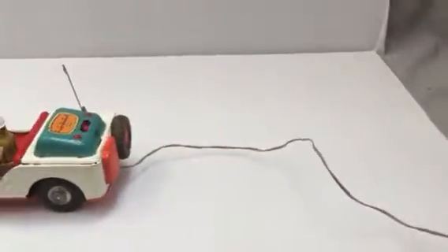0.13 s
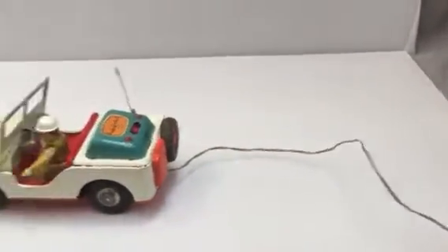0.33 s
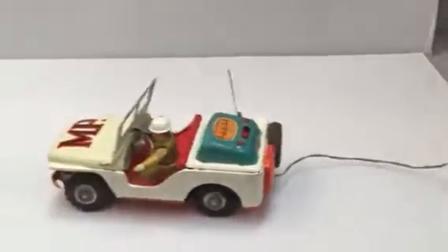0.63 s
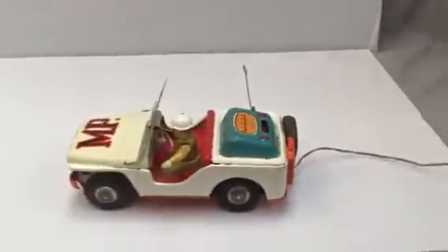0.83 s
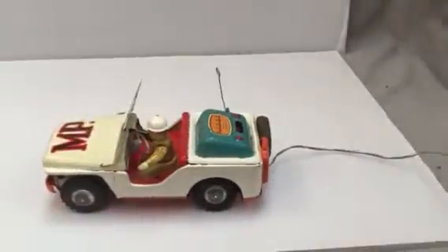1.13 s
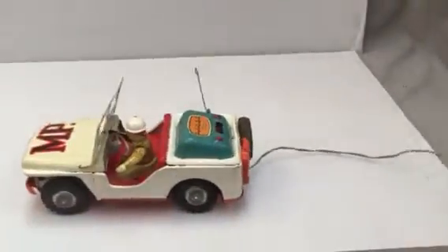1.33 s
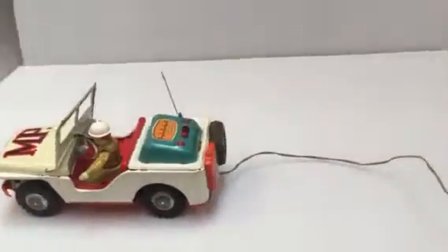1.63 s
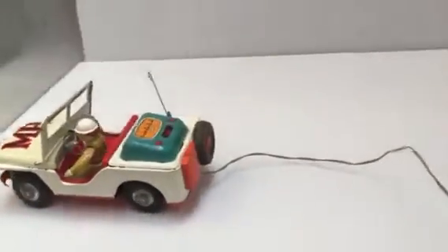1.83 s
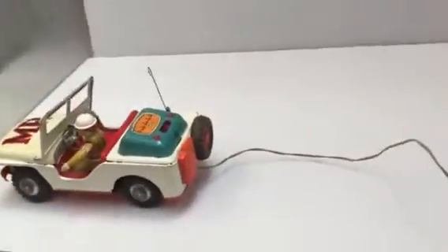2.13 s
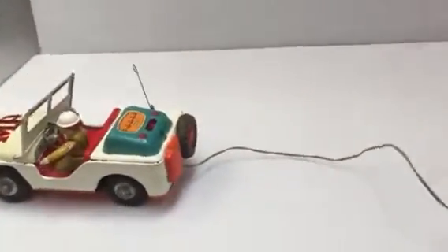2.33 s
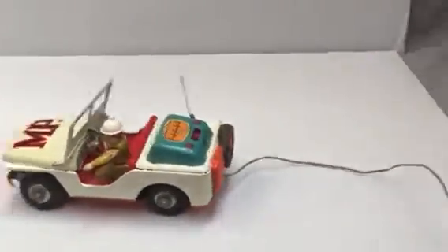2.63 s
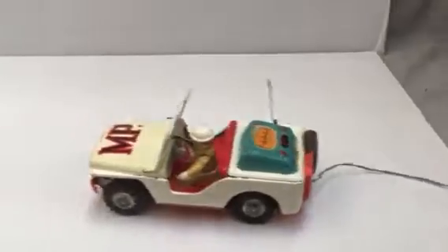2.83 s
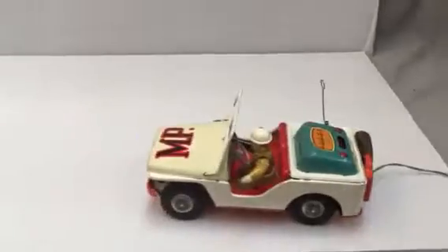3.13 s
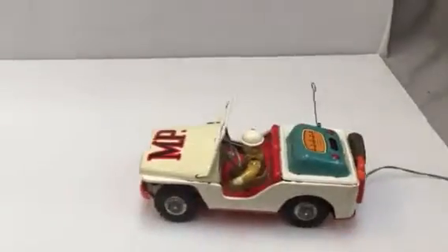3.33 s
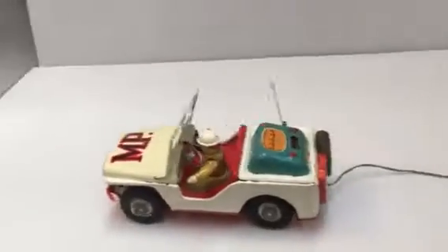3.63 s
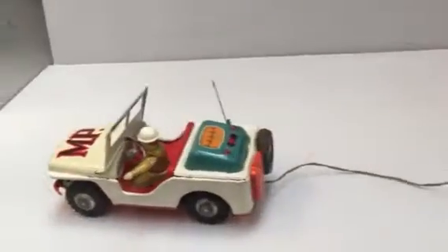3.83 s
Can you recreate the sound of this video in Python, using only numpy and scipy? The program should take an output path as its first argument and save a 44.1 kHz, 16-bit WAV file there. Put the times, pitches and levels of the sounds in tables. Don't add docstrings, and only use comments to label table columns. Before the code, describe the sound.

Close indoor sound of a tin toy car: harsh bright gear chatter over a low wheel rumble, stopping and restarting repeatedly, with clicks at reversals and tiny high squeaks as it halts.

```python
import sys
import numpy as np
from scipy import signal
from scipy.fft import rfft, irfft
from scipy.io import wavfile
from scipy.ndimage import uniform_filter1d

SR = 44100
rng = np.random.default_rng(int(sys.argv[2]) if len(sys.argv) > 2 else 0)


def decibels_to_gain(level_db):
    exponent = np.asarray(level_db, float) / 20
    return 10 ** exponent


def waveform_to_disk(signal):
    frames = np.transpose(np.atleast_2d(signal))
    scaled = np.clip(frames, -1, 1) * 32767
    samples = np.round(scaled).astype(np.int16)
    wavfile.write(sys.argv[1], SR, samples)


N = 176400


def evened(x):
    return x / np.sqrt(np.mean(x ** 2) + 1e-20)


def curve(points, column=1, **ends):
    rows = np.array(points, float)
    return np.interp(np.arange(N) / SR, rows[:, 0], rows[:, column], **ends)


def coloured(x, points):
    f, db = np.transpose(points)
    hz = np.fft.rfftfreq(len(x), 1 / SR)
    gain_db = np.interp(np.log(hz + 1), np.log(f + 1), db, left=-60, right=-60)
    return irfft(rfft(x) * decibels_to_gain(gain_db), len(x))


def drift(rate_hz):
    slow = rfft(rng.standard_normal(2048))
    slow = irfft(slow / (1 + (np.arange(len(slow)) * SR / N / rate_hz) ** 4))
    return np.interp(np.linspace(0, 2047, N), np.arange(2048), evened(slow))


def resonate(x, hz, width_hz):
    turn = np.exp(2j * np.pi * np.cumsum(hz * np.ones(len(x))) / SR)
    r = np.exp(-np.pi * width_hz / SR)
    return 2 * (turn * signal.lfilter([1 - r], [1, -r], x / turn)).real


def ring(x, hz, width_hz):
    return signal.lfilter(*signal.iirpeak(hz, hz / width_hz, SR), x)


def add(mix, s, sound):
    part = mix[round(s * SR):][:len(sound)]
    part += sound[:len(part)]


# (time [s], level [dB])
RUNS = [
    [(0, -34.5), (.05, -43.5), (.13, -51.5), (.165, -68), (.19, -78)],
    [(.275, -60), (.295, -45), (.319, -45.5), (.403, -35), (.663, -33.5), (.8, -34.5), (.88, -45),
     (.94, -53.5), (1.0, -72)],
    [(1.22, -73), (1.27, -51.5), (1.378, -46), (1.47, -41), (1.884, -38), (1.95, -49.5), (1.99, -55.5),
     (2.07, -79)],
    [(2.11, -88), (2.144, -50.5), (2.208, -39), (2.27, -34), (2.868, -33.5), (2.97, -45), (3.03, -51),
     (3.07, -65), (3.13, -74.5), (3.2, -74)],
    [(3.32, -85), (3.342, -57.5), (3.37, -48), (3.568, -46), (3.7, -40), (3.82, -39.5), (3.93, -49),
     (4.0, -61.5)],
]


def drive_db():
    efforts = [curve(run, left=-84, right=-84) for run in RUNS]
    return uniform_filter1d(np.max(efforts, axis=0), size=200)


# (time [s], speed [turns per s])
SHAFT = [(0, 55), (.19, 22), (.45, 75), (.75, 105), (1.1, 26), (1.6, 77), (1.85, 92), (2.07, 31.6),
         (2.3, 76.5), (2.55, 103), (2.8, 108), (3.2, 24.5), (3.75, 80), (4, 46)]


def shaft_speed():
    return curve(SHAFT)


def rattle():
    teeth_per_s, spread_db, throb_depth = 12000, 0.5, 0.08
    turn = 2 * np.pi * np.cumsum(shaft_speed() * (1 + 0.0299 * drift(12.3))) / SR
    sizes = rng.standard_normal(N) * decibels_to_gain(spread_db * rng.exponential(1, N))
    teeth = sizes * (rng.random(N) < teeth_per_s / SR)
    throb = 1 + throb_depth * (np.cos(turn) + 0.18 * np.cos(2 * turn + 1) + 0.52 * np.cos(3 * turn + 2))
    return decibels_to_gain(drive_db()) * evened(teeth * throb * decibels_to_gain(1.25 * drift(75)))


# (frequency [Hz], width [Hz], level [dB])
BODY = [(1290, 255, -7.5), (2050, 234, -5), (2844, 730, -8.5), (3192, 200, -9), (3790, 120, -23),
        (4540, 400, -5), (5330, 216, -9), (5890, 620, -9), (6930, 280, -14.5), (8750, 69, -8.5),
        (11500, 130, -28)]
# (frequency [Hz], level [dB per Hz])
GRIND = [(380, -21), (620, -8.5), (900, -14), (1150, -3.5), (4480, -2), (9300, -7), (10400, -12.5),
         (11300, -9), (15300, -11)]
# (time [s], level [dB])
TREBLE = [(0, -7), (.3, -2), (1.8, 3), (1.95, 2), (2.03, -16), (2.13, -14), (2.25, 0.9), (2.9, 0.5),
          (3.7, 3.5), (4, 2)]
# (time [s], level [dB])
FLOOR_PAN = [(0, 5), (.62, 1), (.76, -7), (1.4, -2.5), (1.64, 1), (1.76, 1), (2.15, 8), (2.45, 3),
             (2.85, -3), (3.72, -7), (3.82, 2)]


def tin(x):
    smear_s, full_speed = .001, 67
    flutter_db, flutter_hz, chatter_db, chatter_hz = 4, 9.4, 3, 70
    scatter = np.exp(-1j * np.pi * smear_s * SR / 2 * np.linspace(0, 1, N // 2 + 1) ** 2)
    x = irfft(rfft(x) * scatter, N)
    x = x + (decibels_to_gain(curve(TREBLE)) - 1) * ring(x, 13600, 9000)
    x = x - np.clip(1.5 - 1.56 * shaft_speed() / full_speed, 0, 1) * ring(x, 4000, 1200)
    panels = []
    for hz, width_hz, db in BODY:
        touch_db = flutter_db * np.tanh(drift(flutter_hz)) + chatter_db * drift(chatter_hz)
        panels.append(decibels_to_gain(db + touch_db) * ring(ring(x, hz, width_hz), hz, 2 * width_hz))
    return decibels_to_gain(curve(FLOOR_PAN)) * panels[0] + sum(panels[1:]) + coloured(x, GRIND)


# (frequency [Hz], level [dB per Hz])
RUMBLE = [(22, -45), (33, -22), (50, -1), (76, -5.5), (107, -1), (150, -10), (200, -23)]
# (frequency [Hz], level [dB per Hz])
ROLL = [(90, -25), (140, 1), (188, 2), (333, -1.5), (420, -15.5), (600, -24.5)]


def table():
    rumble_db, rumble_follow, roll_db, roll_follow, lumps_db = -47.5, 0.53, -49.5, 0.98, 2
    effort_db = uniform_filter1d(np.maximum(drive_db(), -70), size=1500) + 33 + lumps_db * drift(18.0)
    rumble = evened(coloured(rng.standard_normal(N), RUMBLE))
    roll = evened(coloured(rng.standard_normal(N), ROLL)) * (shaft_speed() / 90) ** 0.67
    return decibels_to_gain(rumble_db + rumble_follow * effort_db) * rumble + decibels_to_gain(roll_db + roll_follow * effort_db) * roll


# (multiple of the shaft speed, level [dB])
ORDERS_DB = [(1, -47), (2, -56), (3, -58)]


def motor():
    speed, noise = shaft_speed(), rng.standard_normal(N)
    strands = np.zeros(N)
    for k, db in ORDERS_DB:
        strand = resonate(resonate(noise, k * speed, 16), k * speed, 30)
        strands += decibels_to_gain(db + 3 * drift(8.7)) * evened(strand)
    return decibels_to_gain(drive_db() + 31.5) * strands


# (frequency [Hz], level [dB per Hz])
AIR = [(22, -50), (35, -10), (55, 3), (120, -9), (253, -20), (523, -31.5), (1490, -33), (15300, -52.5)]


def still_air():
    return decibels_to_gain(-55.5 + 1.2 * drift(11)) * evened(coloured(rng.standard_normal(N), AIR))


def room(x):
    t60_s = 0.084
    t = np.arange(SR // 3) / SR
    echoes = rng.choice([-1., 1.], len(t)) * (rng.random(len(t)) < .05)
    tail = echoes * decibels_to_gain(-60 * t / t60_s) * (t > .004)
    return signal.fftconvolve(x, tail / np.linalg.norm(tail))[:N]


# (time [s], peak level [dB], pitch [Hz])
JOLTS = [(.01, -45.5, 296), (.284, -55.5, 630), (.479, -38.5, 323), (.582, -40, 224), (.726, -49, 218),
         (1.565, -54, 320), (1.718, -39.5, 254), (1.777, -43, 280), (2.207, -53, 296), (2.29, -43.5, 307),
         (2.453, -46, 333), (2.724, -43, 282), (3.642, -55, 252)]


def jolts():
    length = 0.0299
    out, t = np.zeros(N), np.arange(0, length, 1 / SR)
    for s, db, hz in JOLTS:
        swell = np.sin(np.pi * (t / length) ** 0.82) ** 2
        add(out, s - length / 4, decibels_to_gain(db) * swell * np.sin(2 * np.pi * (hz * t + rng.random())))
    return out


# (time [s], level [dB])
BUMPS = [(0.051, -42.5), (0.461, -39.5), (.7, -36.5), (0.789, -38.5), (1.409, -45.5), (1.72, -40),
         (1.89, -42.5), (2.28, -40.5), (2.52, -40.5), (2.731, -38.5), (3.01, -44.5), (3.65, -40.5),
         (3.77, -39.5)]


def bumps():
    pitch_hz, length = 51.3, 0.076
    out, t = np.zeros(N), np.arange(0, length, 1 / SR)
    for s, db in BUMPS:
        turn = 2 * np.pi * (pitch_hz * (1 + 0.077 * rng.standard_normal()) * t + rng.random())
        thud = np.sin(turn) + 0.28 * np.sin(1.893 * turn)
        add(out, s, decibels_to_gain(db + 0.5) * np.sin(np.pi * t / length) ** 2 * thud)
    return out


# (time [s], peak level [dB], t60 [s], brightness [0-1])
KNOCKS = [(0.1164, -34.5, 0.05, 0.6), (0.170, -39, 0.038, 0.5), (0.2765, -37, 0.03, 1),
          (0.294, -22.5, 0.03, 1), (0.8946, -23.5, 0.065, 0.6), (1.124, -43, 0.044, 0.4),
          (1.855, -28, 0.041, 0.7), (1.8874, -36, 0.045, 0.6), (1.953, -28, 0.057, 1),
          (2.14, -37, 0.045, 0.6), (2.989, -22.5, 0.036, 0.8), (3.2054, -41.5, 0.037, 0.7),
          (3.2984, -56, 0.045, 0.6), (3.307, -45.5, 0.028, 0.6), (3.3378, -44, 0.04, 0.9),
          (3.619, -26, 0.045, 0.7)]


def knocks():
    blows, t = np.zeros(N), np.arange(4000) / SR
    for s, db, t60, bright in KNOCKS:
        crack = rng.standard_normal(len(t))
        dull = ring(crack, 3000, 2500)
        fade = np.minimum(t / 0.00098, 1) * decibels_to_gain(db - 12.5 - 60 * t / max(t60, .01))
        add(blows, s, fade * (dull + bright * (crack - dull)))
    return blows


# (start [s], length [s], pitch [Hz], level
# [dB], roughness [0-1])
HUMS = [
    (.118, 0.043, 11500, -68, .2),
    (.195, 0.09, 1567, -70.5, .1),
    (1.09, .07, 2300, -67.5, 0.9),
    (1.98, 0.11, 1364, -63, 0.7),
    (3.06, 0.12, 2080, -66.5, 0.6),
    (3.22, .07, 2050, -73, .6),
    (3.905, 0.043, 697, -57, 0.52),
]


def hums():
    out = np.zeros(N)
    for s, length, hz, db, rough in HUMS:
        t = np.arange(0, length, 1 / SR)
        fuzz = evened(resonate(rng.standard_normal(8000), hz, 0.16 * rough * hz))[-len(t):]
        tone = (1 - rough) * np.sqrt(2) * np.sin(2 * np.pi * hz * t) + rough * fuzz
        add(out, s, decibels_to_gain(db) * np.sqrt(np.sin(np.pi * t / length)) * tone)
    return out


# (start [s], length [s], pitch [Hz], level [dB])
SQUEALS = [(0.128, 0.021, 8750, -43.5), (0.871, 0.02, 11450, -42), (0.891, .024, 8600, -30.5),
           (0.916, 0.042, 7800, -35), (0.941, 0.048, 7930, -50), (0.916, 0.079, 11460, -34),
           (1.194, 0.016, 5500, -38), (1.204, 0.036, 5600, -60), (1.193, .012, 10900, -53),
           (1.37, 0.009, 3030, -32.5), (1.877, .012, 11500, -43), (1.895, .015, 11500, -39.5),
           (1.92, 0.011, 11500, -45), (1.997, 0.015, 2564, -36), (2.992, 0.019, 8600, -35),
           (2.988, 0.013, 6450, -30.5), (2.974, .11, 11500, -40.5), (3.004, 0.047, 7800, -47.5),
           (3.107, .015, 2080, -60), (3.193, 0.024, 2620, -54), (3.202, 0.018, 2006, -47),
           (3.305, .014, 2050, -53), (3.864, .13, 11460, -52)]


def squeals():
    rough, peak_at, width_hz = .45, 0.59, 125
    out = np.zeros(N)
    for s, length, hz, db in SQUEALS:
        u = np.arange(0, length, 1 / SR) / length
        fuzz = evened(resonate(rng.standard_normal(6000), hz, width_hz * 0.028 / length))[-len(u):]
        tone = (1 - rough) * np.sqrt(2) * np.sin(2 * np.pi * hz * length * u) + rough * fuzz
        add(out, s, decibels_to_gain(db) * np.sin(np.pi * u ** peak_at) ** 1.3 * tone)
    return out


# (time [s], pitch [Hz], peak level [dB], t60 [s])
PINGS = [(.1705, 2060, -53, 0.036), (.1705, 2890, -54.5, 0.079), (.1705, 4500, -54, .045),
         (.1705, 6228, -68, .06), (.2935, 4300, -42, .03), (.2935, 6160, -41, 0.025),
         (0.399, 3190, -34, .03), (.567, 3190, -30, .07), (.632, 4540, -25, .03), (.654, 4590, -26, .03),
         (.677, 4530, -30, .025), (.697, 4440, -29, .03), (.7325, 4450, -27, 0.027),
         (1.1256, 2020, -52, .03), (1.1256, 3980, -51.5, 0.028), (1.228, 3000, -62, .06),
         (1.603, 4640, -32, .025), (1.64, 4500, -30, .025), (1.745, 5280, -32, .04),
         (1.8265, 2940, -35, .04), (2.242, 4400, -29.5, 0.032), (2.378, 2750, -30, 0.034),
         (3.182, 2100, -60, .04), (3.197, 4050, -56, 0.055), (3.3076, 2870, -56, 0.032),
         (3.3645, 2820, -48, .06), (3.938, 6030, -37, 0.033)]


def pings():
    out, t = np.zeros(N), np.arange(3000) / SR
    for s, hz, db, t60 in PINGS:
        pair = np.sin(2 * np.pi * hz * t) + 0.45 * np.sin(2 * np.pi * (hz * 1.03 * t + rng.random()))
        rise = np.minimum(t / 0.00093, 1)
        add(out, s, decibels_to_gain(db - 60 * t / max(t60, .008)) * rise * pair)
    return out


# (time [s], pitch [Hz], level re drive [dB])
WHINES = [
    [(1.3, 2690, -11), (1.37, 3000, -3), (1.43, 3560, -3.5), (1.5, 4250, -3), (1.62, 4430, -4),
     (1.7, 4700, -6.5), (1.77, 5200, -8), (1.87, 6030, -5), (1.93, 5600, -24)],
    [(3.5, 2800, -30), (3.57, 3000, 0.5), (3.63, 3220, -18), (3.7, 4500, -3), (3.76, 4560, -5),
     (3.8, 5230, -5), (3.83, 5540, -17), (3.88, 5600, -34)],
]


def whine():
    level_db = np.max([curve(w, column=2, left=-93, right=-90) for w in WHINES], axis=0)
    pitch_hz = curve(WHINES[0] + WHINES[1]) * (1 + 0.035 * drift(23))
    tone = evened(resonate(rng.standard_normal(N), pitch_hz, 450))
    return decibels_to_gain(drive_db() + level_db - 5.5 + 2.5 * drift(70)) * tone


def gears():
    return decibels_to_gain(6.5) * tin(rattle() + knocks() + whine())


def scene():
    toy = gears() + squeals() + pings() + hums()
    toy = toy - .5 * ring(toy, 10650, 470)
    on_table = table() + motor() + bumps() + jolts()
    return (toy + decibels_to_gain(-12) * room(toy) + on_table + still_air())[None]


def low_pass(x):
    return signal.sosfilt(signal.butter(12, 16310, fs=SR, output="sos"), x)


# (start [s], length [s], above [Hz])
DROPS = [
    (0.952, 0.064, 12300),
    (1.188, .02, 12000),
    (1.97, .12, 13500),
    (3.02, .06, 13300),
    (3.88, .12, 14700),
]


def record(dry):
    cut = signal.oaconvolve(dry, signal.firwin(301, 15450, fs=SR)[None], "same")
    t = np.arange(N) / SR
    for s, length, hz in DROPS:
        top = signal.oaconvolve(cut, signal.firwin(301, hz, fs=SR, pass_zero=False)[None], "same")
        gate = uniform_filter1d(1. * (t > s) * (t < s + length), size=300)
        cut = cut - gate * top
    return low_pass(cut)


dry = scene()
out = record(dry)
waveform_to_disk(out)
```